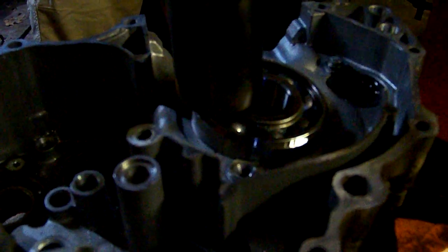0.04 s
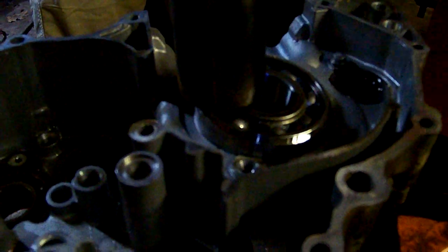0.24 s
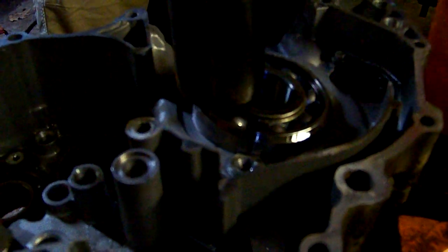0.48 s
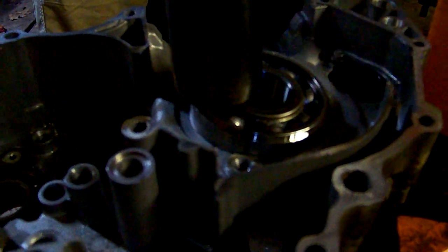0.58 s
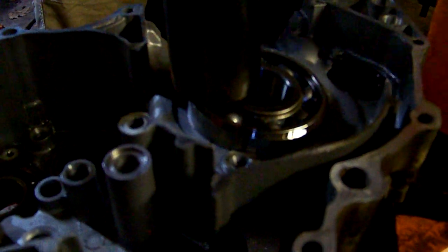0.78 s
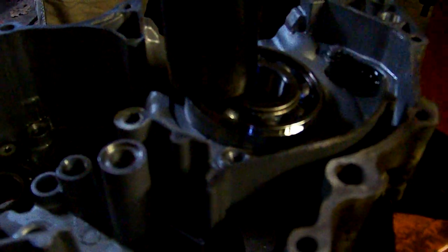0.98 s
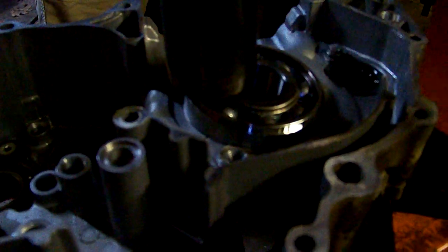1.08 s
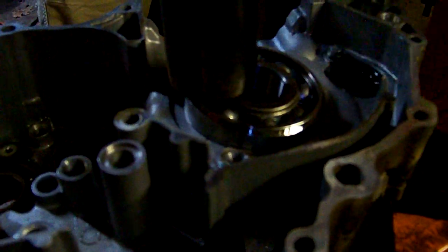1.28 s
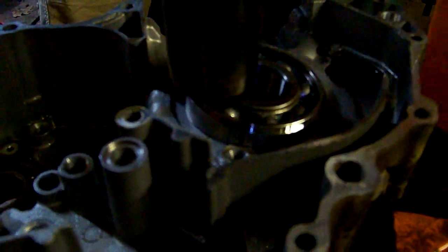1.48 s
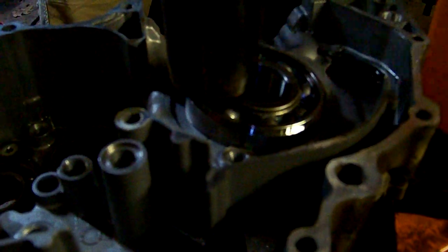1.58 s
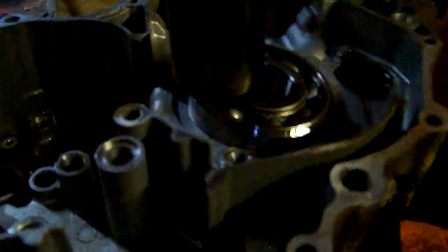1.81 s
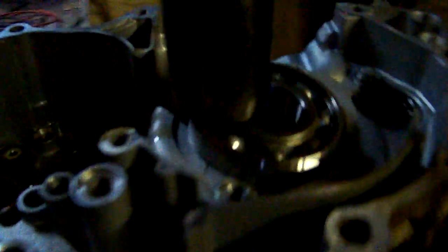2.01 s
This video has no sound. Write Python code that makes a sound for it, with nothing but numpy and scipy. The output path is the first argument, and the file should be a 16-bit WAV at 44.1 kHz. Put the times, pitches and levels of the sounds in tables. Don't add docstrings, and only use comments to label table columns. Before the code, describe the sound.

Metal parts click, knock and crack unevenly as a workshop press forces a bearing into a casing

```python
import sys
import numpy as np
from scipy import signal
from scipy.fft import rfft, irfft, next_fast_len
from scipy.io import wavfile
from scipy.ndimage import uniform_filter1d

SR = 44100
rng = np.random.default_rng(int(sys.argv[2]) if len(sys.argv) > 2 else 0)


def gain_from_decibels(decibels):
    exponent = np.asarray(decibels, float) / 20
    return 10 ** exponent


def output_pcm(signal):
    pcm = np.clip(np.atleast_2d(signal).T, -1, 1) * 32767
    wavfile.write(sys.argv[1], SR, np.round(pcm).astype(np.int16))


N = 90404

# start in seconds, level in dB, favoured pitch in Hz,
# chatter length in seconds, bright edge in dB over the body.
PIN_CLICKS = [(.1463, -26.5, 2300, .001, -19), (.1465, -26, 3280, .001, -11),
              (.1813, -32.5, 2800, .001, -10), (.1970, -35.5, 2900, .003, -19),
              (.2040, -45, 3200, 0.00086, 2), (.2095, -18.5, 3100, .001, -7.5),
              (.2112, -9.5, 3330, 0.003, -18), (.2165, -20.5, 3200, 0.0027, -8),
              (.2225, -20.5, 3540, .003, -32), (.2272, -22, 3500, 0.0012, -6.5),
              (.2365, -24, 3600, .004, -10), (.2435, -35, 3600, 0.0034, -12), (.7538, -39, 3050, .002, -15),
              (.7576, -27.5, 3200, .002, -21), (.7645, -33, 2960, .006, -8.5),
              (1.0206, -33.5, 3090, .002, -15), (1.0367, -18.5, 3220, 0.0023, -13),
              (1.0415, -33, 3220, 0.00203, -9), (1.1698, -38, 2270, 0.0018, -26),
              (1.1797, -28, 2820, .002, -24), (1.2022, -44.5, 2940, 0.0033, -8),
              (1.2096, -18.5, 2810, .002, -15), (1.2112, -27, 1460, 0.0033, -21.5),
              (1.2148, -37.5, 2880, .002, -1.5), (1.2292, -26.5, 3070, .001, -1.5),
              (1.2307, -14, 3110, 0.0014, -30.5), (1.2385, -18, 3200, 0.0027, -25),
              (1.2438, -24.5, 3200, 0.0015, -9), (1.2475, -23, 3620, .004, -25.5),
              (1.2545, -30, 3000, 0.0044, -6.5), (1.6857, -34, 2840, 0.0016, -17),
              (1.6890, -25.5, 3200, .002, -20), (1.6965, -29, 2800, 0.0021, -8.5),
              (1.9380, -32, 2980, .002, -15), (1.9390, -40.5, 1580, 0.0035, -20),
              (1.9661, -39, 3180, .001, -11), (1.9733, -34.5, 3130, .001, -17),
              (1.9740, -36.5, 1500, 0.0034, -18), (1.9860, -39, 3130, 0.0022, -1)]
BEARING_SLIPS = [(.0850, -44.5, 4300, .002, -5), (.8164, -22.5, 2810, 0.0046, -11),
                 (.8266, -27, 2930, .001, 3), (.8313, -24, 3060, 0.00089, -2.5),
                 (.8356, -20.5, 3050, 0.0026, -10.5), (.8475, -39, 2970, .004, -12),
                 (.8605, -18, 3100, 0.0015, -10.5), (.8642, -18, 3380, .001, 5),
                 (.8665, -17.5, 3470, 0.0019, -4.5), (.8722, -16.5, 3240, 0.0036, -8.5),
                 (.8750, -12.5, 3820, 0.0025, -12), (.8815, -34, 3800, 0.0046, -20),
                 (.8870, -44, 3600, .005, -16), (1.7430, -31, 3100, .002, -9),
                 (1.7475, -22.5, 2850, .002, -0.5), (1.7503, -23.5, 3200, 0.0018, -14),
                 (1.7545, -21, 2960, 0.0017, -6), (1.7580, -25, 2770, .003, -7.5),
                 (1.7640, -39, 3360, 0.0049, -9), (1.7828, -29, 3250, .001, -7.5),
                 (1.7850, -26, 3400, .003, -14), (1.7925, -41, 3200, 0.0025, -10),
                 (1.7962, -18, 3050, .002, -16), (1.8040, -39, 3300, .004, 3.5),
                 (1.8982, -44.5, 3060, .001, 6)]
# start in seconds, level in dB, contact time in seconds, long ring in dB.
FRAME_BLOWS = [(.152, -34.5, .0004, -3), (.198, -28, 0.00096, -6), (.2135, -26.5, 0.00017, -13),
               (.2303, -13.5, 0.000068, 2), (0.235, -10, 0.00026, -0.5), (.2445, -17, 0.00045, 3.5),
               (.8166, -29.5, 0.00019, -9), (.871, -23, 0.00018, 4.5), (1.021, -34.5, .0003, -1),
               (1.194, -29, 0.0011, 1.5), (1.2468, -10, 0.00021, -5), (1.2512, -11, 0.00023, -1.5),
               (1.2585, -20, 0.00024, 10.5), (1.753, -26.5, 0.000091, -6), (1.7825, -29, 0.000098, -8)]
# start in seconds, level in dB, chatter length in seconds.
STOP_LANDINGS = [
    (0.7574, -19.5, .0017),
    (.763, -23.5, 0.0032),
    (0.7743, -21.5, 0.0054),
    (1.689, -20.5, 0.0016),
    (1.696, -18, 0.0037),
    (1.7073, -25, .004),
    (1.861, -39, 0.0057),
]
# start in seconds, level in dB, length in seconds, first swing (1 up, -1 down).
METAL_CRACKS = [
    (.2306, -9, .0007, 1),
    (.758, -21, .0008, 1),
    (.8718, -.5, .0003, 1),
    (1.2474, -7, .0009, -1),
    (1.6894, -20, .0009, 1),
    (1.7965, -16, .0004, -1),
]

# frequency in Hz, level in dB, t60 in seconds.
STEEL_MODES = [(1486, -2.5, 0.051), (1755, -1, 0.032), (2130, -9.5, 0.037), (2250, 2, .04),
               (2453, -4, 0.03), (2755, -1, 0.019), (3036, -7, 0.033), (3200, 0, 0.026), (3490, -9, 0.022),
               (3715, -3.5, .04), (3832, -5.5, 0.029), (4003, -8, 0.02), (4350, -5.5, 0.026),
               (5100, -11, 0.035)]
# frequency in Hz, level in dB, t60 in seconds.
THUD_MODES = [(125, -20, 0.057), (409.3, -13.5, 0.081), (534, -8.5, 0.036), (691, -20, 0.15),
              (765, -3.5, 0.04), (863.5, 3.5, 0.091), (1054, -6.5, 0.096), (1247, -4.5, 0.097),
              (1359, -10.5, 0.1), (1477, 1.5, 0.057), (1616, -0.5, 0.11), (1801, -2.5, 0.06),
              (2017, 1, 0.055), (2114, -2.5, 0.095)]
# frequency in Hz, level in dB, t60 in seconds.
UPRIGHT_MODES = [(508.6, -31.5, 1), (1436, -25, 0.44), (1467, -19.5, 0.98), (1574, -29, 1),
                 (1800, -31.5, 0.17), (2257, -26, .3), (2340, -24.5, 0.49), (2520, -31.5, 0.73),
                 (2500, -31, 0.53)]
# frequency in Hz, level in dB, t60 in seconds.
BED_MODES = [(829, -21, .9), (870, -24, .5), (1015, -26, .8), (1137, -27, .9), (1237, -25, .8)]
# frequency in Hz, level in dB, t60 in seconds.
STOP_MODES = [(416, -3, 0.12), (557, -3.5, 0.056), (697, 1, 0.03), (880, -1, 0.026), (938, 5.5, 0.048),
              (1110, -5, 0.057), (1494, -3.5, 0.05), (2060, -12.5, 0.026)]

# time in seconds, level in dB.
SWAY_LEVEL = [(0, -51.5), (.16, -49), (.3, -52.5), (.5, -41.5), (.7, -55.5), (.77, -37), (.95, -70.5),
              (1.2, -40), (1.4, -63), (1.63, -46.5), (1.8, -47), (1.88, -52), (2.05, -90)]
# frequency in Hz, density in dB per Hz.
HUSH_SPECTRUM = [(25, 8.5), (70, 5.5), (110, -2), (230, -7), (480, -2), (1500, -7), (1900, -12.5),
                 (6500, -19.5)]
# frequency in Hz, left-right likeness (1 is equal).
HUSH_LIKENESS = [(60, 0.8), (330, 0.53), (1800, 0.35), (9900, 0.23)]
# time in seconds, lift of the hush in dB.
HANDLING = [
    (.08, -0.04),
    (.6, -1),
    (1.55, -0.5),
    (1.85, 0.5),
]
# frequency in Hz, t60 in seconds.
ROOM_DECAY = [(300, .3), (1000, .3), (3000, .22), (5500, .17), (9000, .11)]
# frequency in Hz, left minus right in dB.
PORT_BALANCE = [(60, 10.5), (170, 9.0), (460, 13), (1280, 5), (3570, 4), (9900, -8)]
# frequency in Hz, gain in dB.
TREBLE_FALL = [(6800, -1.78), (7800, -14.5), (9400, -26.5), (10300, -48.5), (12000, -46)]


def evened(x):
    return x / np.sqrt(np.mean(x ** 2) + 1e-20)


def peaked(x, db):
    return gain_from_decibels(db) * x / np.sqrt(uniform_filter1d(x ** 2, size=88).max())


def read(points, hz):
    f, value = np.transpose(points)
    return np.interp(np.log(hz + 1), np.log(f + 1), value)


def add(mix, s, sound):
    part = mix[round(s * SR):][:len(sound)]
    part += sound[:len(part)]


def ring(modes, scale, length, blur, count):
    spread_db, phase_spread, rise_s = 2.5, .13, .0002
    t = np.arange(0, length, 1 / SR)
    f, db, t60 = np.repeat(modes, count, axis=0).T[:, :, None]
    strength, detune, phase = rng.standard_normal((3, len(f), 1))
    envelope = gain_from_decibels(db + spread_db * strength - 60 * t / t60)
    partial_hz = scale * f * (1 + blur * detune)
    partials = envelope * np.sin(2 * np.pi * (partial_hz * t + phase_spread * phase))
    return (1 - np.exp(-t / rise_s)) * partials.sum(0)


def chatter(length):
    contacts_per_s, shower_db = 1300, -9
    t = np.arange(2000) / SR
    when, size = rng.random((2, 2000))
    fade = np.exp(-(t / max(length, 1e-4)) ** 2)
    drive = (when < contacts_per_s / SR) * (2 * size - 1) * gain_from_decibels(shower_db) * fade
    return np.r_[1, drive[1:]]


def scattered(modes, scale, like):
    burst_s = .0004
    t = np.arange(600) / SR
    f, db, _ = np.transpose(modes)[:, :, None]
    colour = (gain_from_decibels(db) * np.sin(2 * np.pi * scale * f * t)).sum(0)
    x = colour * np.exp(-t / burst_s) * t
    return x * np.linalg.norm(like) / np.linalg.norm(x)


def hush():
    level_db, patch_db = -44, 3
    frames, hz = N // 512 + 5, np.fft.rfftfreq(2048, 1 / SR)
    a, b, c, d, patches = rng.standard_normal((frames, 1025, 5)).T
    patches = uniform_filter1d(patches, size=8, axis=0)
    patches = evened(uniform_filter1d(patches, size=8, axis=1))
    stir_db = np.interp(np.arange(frames) * 512 / SR, *np.transpose(HANDLING))
    same = np.clip(read(HUSH_LIKENESS, hz), -1, 1)[:, None]
    left = a + 1j * b
    right = same * left + np.sqrt(1 - same ** 2) * (c + 1j * d)
    shape_db = read(HUSH_SPECTRUM, hz)[:, None] + patch_db * patches + stir_db
    noise = signal.istft(np.array([left, right]) * gain_from_decibels(shape_db), nperseg=2048, noverlap=1536)[1]
    return gain_from_decibels(level_db) * evened(noise[:, :N])


def room(x):
    taps = np.zeros((2, SR // 2))
    at = np.arange(100, SR // 2 - 20, 20)
    at = at + rng.integers(0, 20, (2, len(at)))
    np.put_along_axis(taps, at, rng.choice([-1., 1.], at.shape), 1)
    hz, t, z = signal.stft(taps, SR, nperseg=256)
    decay = gain_from_decibels(-60 * t / read(ROOM_DECAY, hz)[:, None])
    tail = signal.istft(z * decay, SR, nperseg=256)[1]
    return signal.fftconvolve(x[None], tail / np.linalg.norm(tail[0]), axes=1)[:, :N]


def sway():
    sway_hz, drift_hz = 41, .8
    t = np.arange(N) / SR
    drift = evened(sum(np.sin(2 * np.pi * (f * t + rng.random())) for f in np.geomspace(1, 8, num=9)))
    level = gain_from_decibels(np.interp(t, *np.transpose(SWAY_LEVEL)))
    cycles = np.cumsum(sway_hz + drift_hz * drift) / SR
    return np.sqrt(2) * level * np.sin(2 * np.pi * cycles)


def stops():
    trim_db = -6.5
    bench_hz, bench_db, bench_s = 76.9, -26, 0.056
    out = np.zeros((2, N))
    t = np.arange(SR // 2) / SR
    swell = np.e * t / bench_s * np.exp(-t / bench_s)
    hum = swell * np.sin(2 * np.pi * bench_hz * t)
    body = ring(STOP_MODES, 0.98, .2, .012, count=2)
    for s, db, length in STOP_LANDINGS:
        knock = peaked(signal.fftconvolve(chatter(length), body), db + trim_db)
        add(out[0], s, knock)
        add(out[1], s, scattered(STOP_MODES, 1, knock))
        add(out[0], s, gain_from_decibels(db + bench_db) * hum)
    return out


def frame():
    trim_db, damp_s, damp_fade_s = -3, 0.14, 0.0089
    out = np.zeros(N)
    t, bed_t = np.arange(200) / SR, np.arange(0, .3, 1 / SR)
    damping = (1 - np.tanh((bed_t - damp_s) / damp_fade_s)) / 2
    for s, db, contact, ring_db in FRAME_BLOWS:
        push = t * np.exp(-t / max(contact / 4, 1e-5))
        body = gain_from_decibels(ring_db) * ring(UPRIGHT_MODES, 1, .8, .005, count=2)
        add(body, 0, gain_from_decibels(ring_db) * ring(BED_MODES, 0.94, .3, 0.0028, count=1) * damping)
        add(body, 0, ring(THUD_MODES, 1, 0.22, .012, count=2))
        add(out, s, peaked(signal.fftconvolve(push, body), db + trim_db))
    return out


def cracks():
    out = np.zeros(N)
    for s, db, length, way in METAL_CRACKS:
        u = np.arange(100) / SR / length
        swings = np.sin(2 * np.pi * u) * np.exp(-(u - .5) ** 2 * 2)
        add(out, s, np.sign(way) * gain_from_decibels(db) * swings)
    return out


def steel_clicks(rows, focus, blur, trim_db):
    floor_db, edge_trim_db, edge_wet_db = -17, 5.95, 1.5
    out = np.zeros((2, N))
    f, mode_db, t60 = np.transpose(STEEL_MODES)
    edge = np.c_[np.linspace(5200, 10000, num=10), np.linspace(0, 3, num=10), np.full(10, 0.021)]
    for s, db, hz, length, edge_db in rows:
        drive = chatter(length)
        favour_db = np.maximum(-10 * (np.log(f / hz) / focus) ** 2, floor_db)
        modes = np.c_[f, mode_db + favour_db, t60]
        body = signal.fftconvolve(drive, ring(modes, 1, .06, blur, count=2))
        body = peaked(body, db + trim_db)
        top = signal.fftconvolve(drive, ring(edge, 0.96, .03, 0.0368, count=3))
        top = peaked(top, db + trim_db + edge_db + edge_trim_db)
        add(out[0], s, body)
        add(out[0], s, top)
        add(out[1], s, scattered(modes, 0.98, body) + gain_from_decibels(edge_wet_db) * scattered(edge, 0.91, top))
    return out


def bearing_slips():
    return steel_clicks(BEARING_SLIPS, focus=.23, blur=.02, trim_db=-1)


def handle_pins():
    return steel_clicks(PIN_CLICKS, focus=.17, blur=.008, trim_db=0)


def scene():
    room_db = -7.5
    direct, to_room = handle_pins() + bearing_slips() + stops() + cracks() + frame()
    return direct + gain_from_decibels(room_db) * room(to_room) + sway() + hush()


def band_limit(x):
    return signal.sosfilt(signal.butter(12, 10500, fs=SR, output="sos"), x)


def record(dry):
    lag_s, limit = .00006, .95
    dip_hz, dip_width, dip_db = 297.7, 0.08, -14
    size = next_fast_len(N + 4096)
    hz = np.fft.rfftfreq(size, 1 / SR)
    right = gain_from_decibels(-read(PORT_BALANCE, hz))
    left = np.exp(-2j * np.pi * hz * lag_s)
    ports = 2 / (1 + right) * np.array([left, right])
    heard = irfft(rfft(dry, size) * ports, size)
    heard = limit * np.tanh(heard / limit)
    dip = dip_db * np.exp(-(np.log((hz + 1) / dip_hz) / dip_width) ** 2)
    colour = gain_from_decibels(read(TREBLE_FALL, hz) + dip)
    heard = irfft(rfft(heard) * colour, size)[:, :N]
    return band_limit(heard)


dry = scene()
out = record(dry)
output_pcm(out)
```